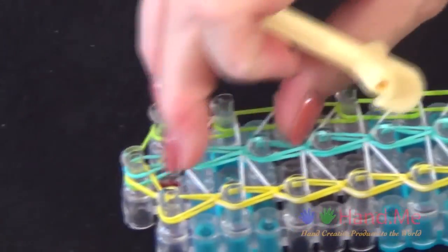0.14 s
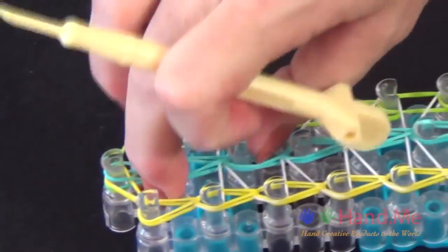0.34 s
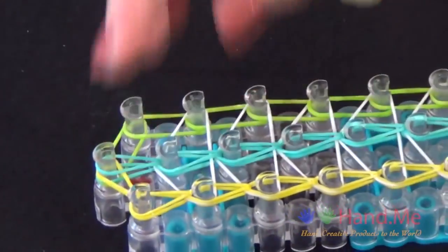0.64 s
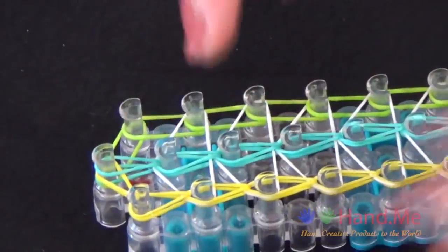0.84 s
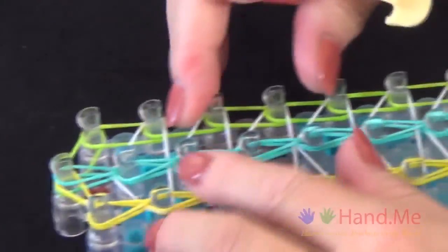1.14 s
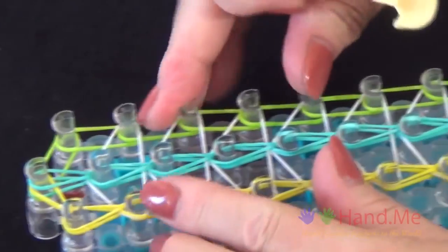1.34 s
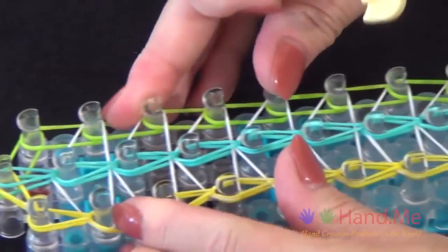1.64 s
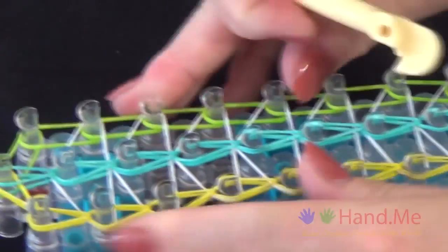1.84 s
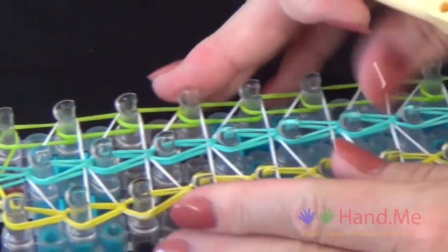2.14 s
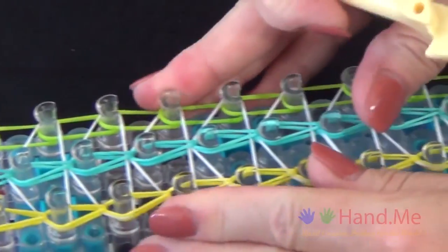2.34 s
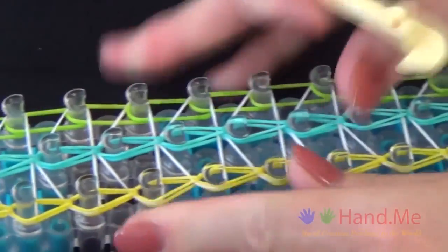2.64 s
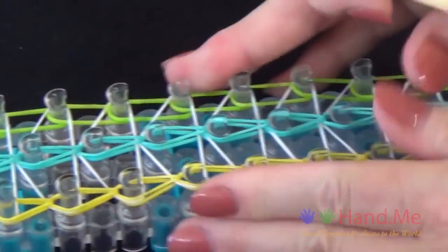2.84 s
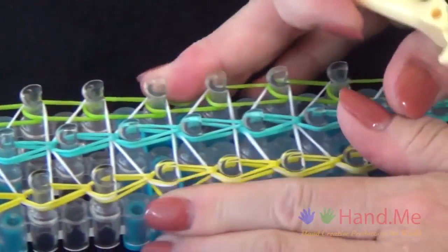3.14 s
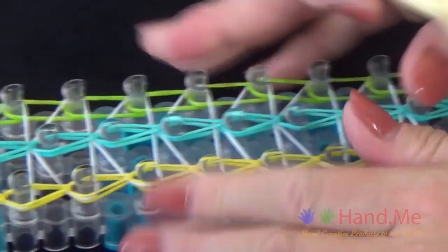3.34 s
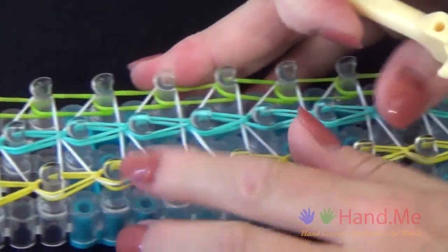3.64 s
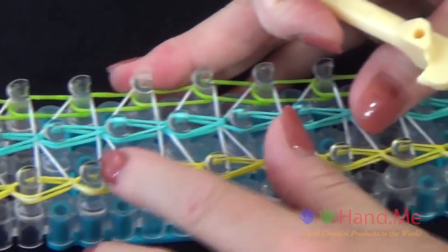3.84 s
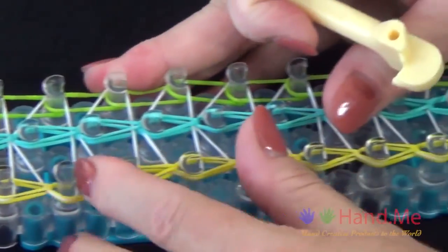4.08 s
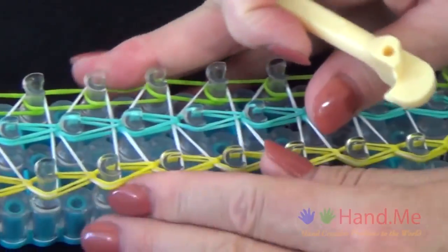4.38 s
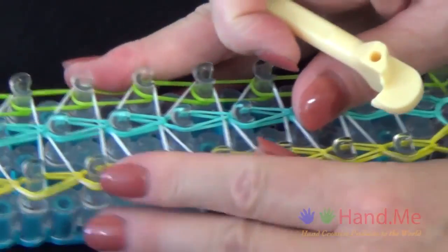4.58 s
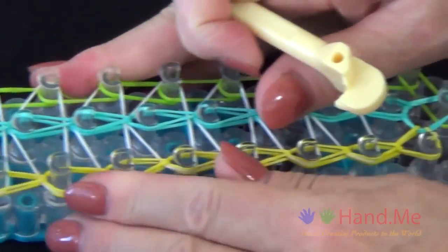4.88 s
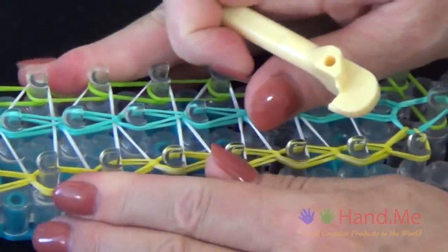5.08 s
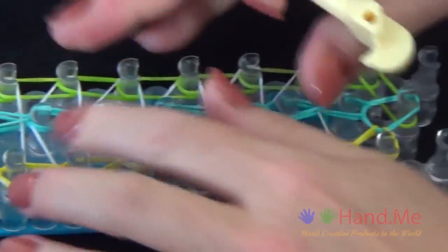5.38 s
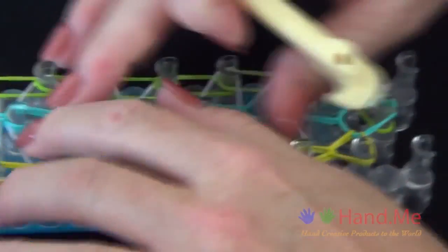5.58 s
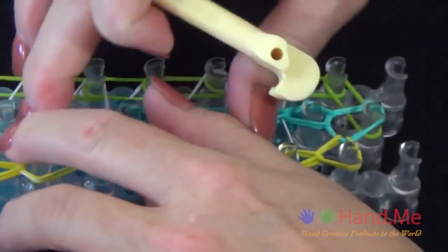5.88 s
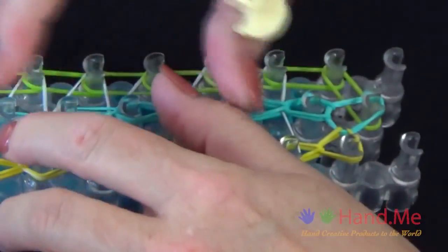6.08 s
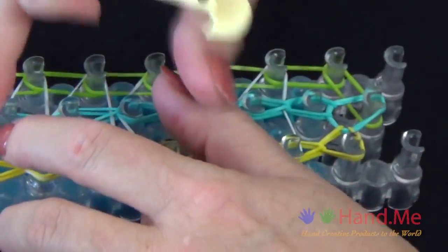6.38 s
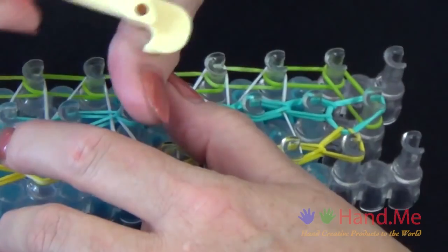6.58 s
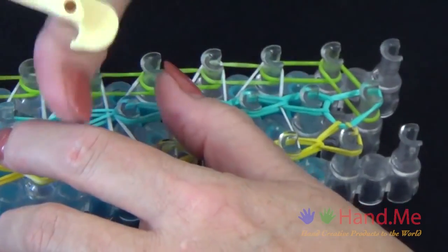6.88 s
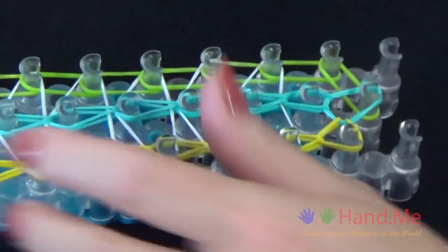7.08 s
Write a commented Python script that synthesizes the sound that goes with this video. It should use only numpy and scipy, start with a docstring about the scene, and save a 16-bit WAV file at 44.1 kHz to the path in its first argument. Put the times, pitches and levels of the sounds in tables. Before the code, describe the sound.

Fingertips press rubber bands down over plastic pegs with light irregular clicks, soft cloth rubs and low table bumps in a quiet room.

```python
"""A small quiet room: fingers with a plastic hook press rubber bands down the pegs of a plastic loom.
Nails and bands tick, slap and scrape as short forces that ring damped modes of the loom's parts;
knocks, pats and thuds ring the loom's rocking, the web of bands and the cloth-covered table in the same way.
Rubbing and creaking are random stick-slip jerks through such modes; cloth hiss is mostly coloured noise.
Low table rumble, a tremble below hearing through the microphone stand, room air and a hum lie beneath."""
import sys
import numpy as np
from scipy import signal
from scipy.fft import rfft, irfft, next_fast_len
from scipy.io import wavfile

SR = 44100
rng = np.random.default_rng(int(sys.argv[2]) if len(sys.argv) > 2 else 0)


def master_out(mix):
    """Clip the mix to full scale and print it as 16-bit PCM to the path in sys.argv[1]."""
    frames = np.transpose(np.atleast_2d(mix))
    ceiling = np.clip(frames, -1, 1)
    pcm = np.round(ceiling * 32767).astype(np.int16)
    wavfile.write(sys.argv[1], SR, pcm)


N = 318251
TIME = np.arange(N) / SR  # [s]

# modes of the loom's frame, base plate, pegs and peg rims:
# (frequency [Hz], bandwidth [Hz], relative level [dB])
FRAME = [(1034, 770, -1), (1206, 136, 10.5), (1554, 200, -1.5)]
PLATE = [(1965, 147, 4.5), (2090, 41, 7), (2116, 194, 8), (2610, 260, -3), (3200, 340, -2)]
PEG = [(3220, 120, -6), (4170, 200, -1), (4530, 99, -4), (4445, 430, 0), (5730, 460, 5), (5615, 330, 6),
       (5487, 600, 1), (7880, 420, -3), (8730, 610, -1), (9190, 520, -2.5)]
RIM = [(9170, 6600, -3.5), (11850, 660, -8.5), (12400, 790, -8), (13650, 1900, 1.5), (15100, 730, -2),
       (16060, 590, -16)]
# modes of the loom rocking on the cloth: (frequency [Hz], bandwidth [Hz], relative level [dB])
ROCKING = [(139.8, 23.3, 5), (202.6, 21.4, 0.5), (276.4, 13.3, -1), (330.6, 24.6, -6), (391.6, 57, -8.5),
           (555, 530, -33)]


def from_db(db):
    """Amplitude ratio of a level: 20 dB is a factor of ten."""
    return 10 ** (np.asarray(db) / 20)


def rms_one(x):
    """Normalise the mean power to 1."""
    return x / np.sqrt(np.mean(x ** 2) + 1e-30)


def add(out, s, sound):
    """Superpose a sound on out from time s."""
    i = max(round(s * SR), 0)
    out[i:i + len(sound)] += sound[:max(N - i, 0)]


def noise(spectrum):
    """Spectral shaping: white noise is filtered to a colour with steep ends, at rms 1."""
    hz, db = np.transpose(spectrum)
    size = next_fast_len(N)
    f = np.maximum(np.fft.rfftfreq(size, 1 / SR), 1)
    low_end = 1 + (hz[0] / f) ** 8
    high_end = 1 + (f / hz[-1] / 2) ** 8
    colour = from_db(np.interp(np.log(f), np.log(hz), db)) / np.sqrt(low_end * high_end)
    white = rng.standard_normal(size)
    return rms_one(irfft(rfft(white) * colour, size)[:N])


def drift(per_s):
    """Slow random fluctuation: Gaussian values, per_s of them a second, joined by straight lines."""
    values = rng.standard_normal(4000)
    return np.interp(TIME * per_s, np.arange(len(values)), values)


def resonate(force, modes, detune=0, uneven_db=0):
    """Modal superposition: parallel damped resonators, each randomly detuned and weighted."""
    out = 0
    for k, (hz, width, db) in enumerate(modes):
        shift, weight = rng.standard_normal(2)
        radius = np.exp(-np.pi * width / SR)  # a wider mode decays faster
        angle = 2 * np.pi * hz * (1 + detune * shift) / SR
        poles = [1, -2 * radius * np.cos(angle), radius * radius]
        ringing = signal.lfilter([1, 0, -1], poles, force + 1e-18)
        gain = (1 - radius * radius) / 2 * from_db(db + uneven_db * weight)
        out = out + (-1) ** k * gain * ringing  # neighbouring modes have opposite sign
    return out


def favour(modes, centre_hz, fall_db):
    """Position-dependent excitation: modes fall by fall_db an octave off centre_hz, up to one octave."""
    return [(hz, width, db - fall_db * min(abs(np.log2(hz / centre_hz)), 1)) for hz, width, db in modes]


def blow(modes, contact_s, scuff, span_s, detune, uneven_db):
    """Impact excitation: an impulse and a brief noisy scuff ring the modes; rms 1 over the first span_s."""
    t = np.arange(int(8 * span_s * SR)) / SR
    grip = t / contact_s * np.exp(-t / contact_s)  # swells and dies
    force = scuff * rng.standard_normal(len(t)) * grip / np.sqrt(np.sum(grip ** 2))
    force[int(contact_s * SR / 2)] += 1
    sound = resonate(force, modes, detune, uneven_db)
    edges_hz = [modes[0][0] / 2, min(modes[-1][0] * 1.5, SR * .45)]
    sound = signal.sosfilt(signal.butter(2, edges_hz, "band", fs=SR, output="sos"), sound)
    return sound / np.sqrt(np.mean(sound[:int(span_s * SR)] ** 2))


def slips(per_s, spread_db):
    """Stick-slip friction: jerks of uneven size and random sign at random moments."""
    sizes = from_db(spread_db * np.minimum(rng.exponential(1, N), 4))
    signs = rng.choice([-1, 1], N)
    return sizes * signs * (rng.random(N) < per_s / SR)


def moves(rows, rest_db):
    """Power addition: each move is a smooth arch of gain, added in power to a resting level."""
    start_db, stop_db = -11.5, -8  # fade half a length before and after the peak
    power = from_db(rest_db) ** 2
    for s, length, db in rows:
        away = (TIME - s) / (length / 2)
        fade_db = np.where(away < 0, start_db, stop_db) * away ** 2
        power = power + from_db(db + np.maximum(fade_db, -100)) ** 2
    return np.sqrt(power)


def peg_clicks():
    """Impact on coupled parts: each touch of nail, hook or band rings frame, plate, peg and rim."""
    # touches: (time [s], frame level [dB], base plate level [dB], peg level [dB], peg rim level [dB],
    # favoured plate frequency [Hz], favoured peg frequency [Hz]); levels of the main snap over 5 ms
    clicks = [(0.1077, -57.0, -64, -59, -66, 2300, 5070), (0.129, -64, -59, -54.5, -79.0, 2600, 5500),
              (0.1393, -50, -52.5, -44, -59, 2750, 4970), (0.1815, -82, -84, -65, -90.0, 2600, 4700),
              (0.1955, -57, -59, -64, -85, 2950, 4500), (0.3123, -65, -78, -72, -90.0, 2900, 4500),
              (0.344, -72, -76, -65, -83, 2900, 5100), (0.359, -70, -85, -62, -90.0, 2900, 4530),
              (0.3676, -84, -80.0, -73, -90.0, 2300, 4530), (0.397, -73, -73, -70, -90.0, 2100, 4500),
              (0.431, -55, -60, -56, -64, 2900, 6200), (0.486, -69, -70, -78, -90.0, 2600, 6000),
              (0.537, -64, -67, -75.0, -88.0, 2300, 6000), (0.675, -78, -79, -63, -90.0, 1900, 6800),
              (0.684, -49.5, -51.5, -52.5, -57, 2300, 5800), (0.6902, -51, -62, -61, -60, 2900, 5100),
              (0.7001, -53.5, -60, -54.5, -68, 2600, 5170), (0.7812, -65, -61, -59, -90.0, 1900, 5540),
              (0.8028, -65, -74.0, -57, -90.0, 1900, 5500), (0.8485, -73, -64, -54, -92, 2900, 5640),
              (0.8774, -84, -58.5, -57, -90.0, 2100, 5630), (1.3402, -56, -66, -48, -67, 1980, 6000),
              (1.352, -51, -56, -53.5, -68, 1900, 6100), (1.367, -61, -59, -52.5, -66, 1900, 5240),
              (1.3867, -65, -60, -55, -68, 2100, 5600), (1.4262, -71, -70, -66.5, -74, 2100, 5500),
              (1.56, -65, -59, -48.5, -52, 2100, 7400), (1.7099, -71, -63, -72.5, -92, 1900, 4450),
              (1.8492, -57.5, -57.5, -58, -90.0, 2600, 4900), (1.9079, -46, -47, -47.5, -52.5, 1900, 5930),
              (1.9179, -54.5, -57, -49.5, -65, 2600, 5200), (2.2061, -77, -76, -69.5, -81, 2900, 5100),
              (2.4995, -82, -71, -69, -90.0, 1900, 4400), (2.735, -69, -66, -78, -90, 2100, 4500),
              (2.752, -77, -64, -61, -90.0, 2300, 5500), (2.7766, -59, -66, -73, -81.0, 1900, 5500),
              (3.0918, -66, -52.5, -53.5, -63, 3200, 5800),
              (3.1654, -58.5, -55.5, -49.5, -56.5, 2300, 4900), (3.396, -86, -86, -63, -77, 1900, 6900),
              (3.4239, -57, -55, -46, -51.5, 1900, 5000), (3.6226, -66, -68.5, -69, -79, 1900, 4500),
              (3.749, -80, -84, -63, -88, 3200, 4470), (3.7963, -78, -66, -62, -90.0, 2300, 5130),
              (3.825, -70, -61, -58, -67, 1900, 4670), (3.899, -81, -66, -69, -82.0, 2300, 5100),
              (3.9513, -66, -80.0, -55.5, -70, 1900, 5060), (3.973, -63, -61, -68, -76, 3200, 8700),
              (4.3122, -49, -43.5, -32.5, -46.5, 1900, 5120), (4.334, -80.0, -61, -50, -82.0, 2100, 4530),
              (4.4456, -60.5, -58.0, -61.5, -63, 1900, 5130), (4.5362, -55, -73, -62.5, -71, 1900, 5330),
              (4.639, -67, -59, -63, -76, 1900, 4460), (4.649, -67, -58, -66, -82, 1900, 4500),
              (4.655, -65, -66, -61, -68, 2600, 5000), (4.699, -62, -52.5, -58.5, -66, 1900, 4540),
              (4.7988, -65.5, -68, -67, -90.0, 3200, 5100), (4.8848, -64.5, -63.5, -64, -90.0, 1900, 5600),
              (4.962, -81, -65, -71, -88, 2000, 4500), (4.9722, -72, -58.5, -81, -83, 2100, 4600),
              (5.271, -80.0, -56.5, -64, -71, 2100, 4500), (5.56, -64, -56, -60, -77, 1900, 5950),
              (5.63, -68, -59.5, -64, -84.0, 1900, 4760), (5.688, -58, -49, -49.5, -69, 2600, 5430),
              (5.7829, -82, -62, -65, -80, 1900, 5500), (5.82, -72, -61, -78.0, -90.0, 1900, 5500),
              (5.8612, -72, -65, -60, -90.0, 1900, 5030), (5.871, -70, -66, -82, -90.0, 2300, 8700),
              (5.907, -65.5, -67, -67.5, -90.0, 1900, 5070), (6.047, -66, -61.5, -62.5, -90.0, 2600, 4440),
              (6.137, -76, -64, -62.0, -88, 1900, 4800), (6.148, -65, -67, -69, -90.0, 1900, 4200),
              (6.1744, -64.5, -62.5, -59.5, -84.0, 1900, 4900),
              (6.3375, -76, -70, -63.0, -90.0, 1900, 5040), (6.547, -70, -68.5, -68, -78, 1900, 5640),
              (6.6764, -62.5, -66, -52, -89.0, 2300, 5730), (6.8661, -74.0, -81, -59.5, -83, 2900, 5860),
              (6.8787, -75, -71, -64, -85, 2900, 6000), (6.9751, -50, -51, -39, -52, 2330, 5500),
              (7.051, -80.0, -65, -62, -65, 2900, 5900), (7.055, -62, -54, -48.5, -59.5, 2300, 5600),
              (7.1511, -52.5, -43.5, -41, -55, 2300, 5940)]
    out = np.zeros(N)
    span_s, detune, uneven_db = .005, .006, 1.0
    for s, *levels, plate_hz, peg_hz in clicks:
        parts = FRAME, favour(PLATE, plate_hz, fall_db=38.5), favour(PEG, peg_hz, fall_db=10.5), RIM
        for modes, db in zip(parts, levels):
            snap = blow(modes, contact_s=.0005, scuff=0.83, span_s=span_s, detune=detune, uneven_db=uneven_db)
            # a softer, noisy scuff overlaps each snap, from 2.5 ms before it to shortly after
            soft = blow(modes, contact_s=0.0028, scuff=23.0, span_s=span_s, detune=detune, uneven_db=uneven_db)
            add(out, s, from_db(db) * snap)
            add(out, s - .0025, from_db(db - 15.5) * soft)
    return out


def band_snaps():
    """Sudden release: a stretched band slips off and slaps the frame with a crack, a ring and a thump."""
    # slaps: (time [s], crack level [dB], crack frequency [Hz], ring level [dB], ring frequency [Hz],
    # thump level [dB]); levels over the first 5 ms
    snaps = [(0.1956, -55, 1460, -52, 1367, -54), (0.595, -68, 1680, -71, 1370, -74),
             (2.776, -70, 1900, -63, 1166, -76), (4.5354, -52.5, 2020, -61.5, 1180, -49)]
    # modes of the slapped web of bands: (frequency [Hz], bandwidth [Hz], relative level [dB])
    thump = [(218, 100, 2), (443, 165, 6.5)]
    out = np.zeros(N)
    crack_width_hz, ring_width_hz = 520, 60
    for s, crack_db, crack_hz, ring_db, ring_hz, thump_db in snaps:
        crack = [(crack_hz, crack_width_hz, 0)]
        ring = [(ring_hz, ring_width_hz, 0)]
        for modes, db in ((crack, crack_db), (ring, ring_db), (thump, thump_db)):
            sound = blow(modes, contact_s=.0002, scuff=0.15, span_s=.005, detune=.003, uneven_db=0)
            add(out, s, from_db(db) * sound)
    return out


def scrapes():
    """Stick-slip excitation: a dragging nail's dense crackle rings the same four parts as a click."""
    # drags: (start [s], length [s], frame level [dB], base plate level [dB], peg level [dB],
    # peg rim level [dB]); levels in full contact
    drags = [(0.133, .025, -73, -79, -80, -84), (0.675, 0.028, -61, -78, -69, -82),
             (1.343, 0.045, -57.5, -73, -74, -85), (1.903, 0.044, -65, -75, -81, -78),
             (3.77, 0.035, -68, -75, -74, -82), (3.968, 0.02, -75, -63, -83, -85)]
    jerks = slips(per_s=1500, spread_db=4.5)
    parts = [rms_one(resonate(jerks, modes)) for modes in (FRAME, PLATE, PEG, RIM)]
    edge_s = 0.011  # ramp into and out of contact
    out = np.zeros(N)
    for s, length, *levels in drags:
        touching = np.clip(np.minimum(TIME - s, s + length - TIME) / edge_s, 0, 1)
        out += touching * sum(from_db(db) * part for db, part in zip(levels, parts))
    return out


def frame_knocks():
    """Rigid-body rocking: the loom bumps on the cloth and rings its rocking modes."""
    # bumps: (time [s], relative level [dB], favoured rocking frequency [Hz])
    knocks = [(0.106, -70, 153), (0.126, -62, 377), (0.146, -55.5, 243), (0.165, -60.5, 207),
              (0.197, -60.5, 172), (0.316, -60.5, 270), (0.334, -62, 292), (0.356, -63, 302),
              (0.403, -64, 200), (0.431, -53, 218), (0.447, -66, 202), (0.482, -69, 385), (0.501, -72, 203),
              (0.538, -67.5, 280), (0.558, -60, 171), (0.684, -64.5, 400.0), (1.34, -67, 148),
              (1.367, -67, 198), (1.385, -54.5, 206), (1.401, -56, 200), (1.528, -63, 152),
              (1.557, -58, 139), (1.612, -67.5, 270), (1.847, -71, 195), (1.905, -60.5, 191),
              (2.456, -63.5, 172), (4.314, -62, 207), (4.542, -51, 199), (4.974, -65.5, 145),
              (5.687, -66, 275), (5.824, -67, 270), (5.99, -64, 151), (6.006, -72, 280), (6.045, -61, 280),
              (6.971, -58.5, 152), (7.01, -72, 200), (7.052, -62.5, 266)]
    out = np.zeros(N)
    for s, db, hz in knocks:
        modes = favour(ROCKING, hz, fall_db=17.5)
        sound = blow(modes, contact_s=0.0028, scuff=0.51, span_s=.03, detune=0.0017, uneven_db=4.0)
        add(out, s, from_db(db + 5.0) * sound)
    return out


def band_pats():
    """Damped membrane-like modes: a fingertip pats the web of bands in a soft, long contact."""
    # pats: (time [s], level over the first 30 ms [dB])
    pats = [(1.152, -59.5), (2.5, -73), (5.99, -71), (6.044, -71)]
    # modes of the damped web of bands: (frequency [Hz], bandwidth [Hz], relative level [dB])
    web = [(487, 70, -15), (646, 58, 1.5), (1110, 210, -4)]
    out = np.zeros(N)
    for s, db in pats:
        sound = blow(web, contact_s=0.01273, scuff=0.95, span_s=.03, detune=0.0076, uneven_db=3.0)
        add(out, s, from_db(db) * sound)
    return out


def table_thuds():
    """Low-frequency plate modes: a hand leans on the table and its top answers."""
    # thuds: (time [s], relative level [dB])
    thuds = [(0.133, -45), (0.449, -42), (0.563, -40.5), (0.674, -65), (0.801, -54), (1.264, -36),
             (1.354, -50), (1.556, -42.5), (1.645, -51), (1.935, -36), (2.834, -45), (3.149, -44),
             (3.434, -53), (3.92, -39.5), (4.54, -40), (4.989, -40.5), (6.977, -41), (7.069, -41.5)]
    # modes of the table top: (frequency [Hz], bandwidth [Hz], relative level [dB])
    table = [(34, 24.7, -3.5), (58.6, 19.4, -1), (74, 22, -26.5)]
    out = np.zeros(N)
    for s, db in thuds:
        sound = blow(table, contact_s=0.0045, scuff=0.64, span_s=.03, detune=0.059, uneven_db=0.0)
        add(out, s, from_db(db - 2.5) * sound)
    return out


def cloth_slides():
    """Sliding friction: cloth hisses under the pushed loom and catching fibres ring the plastic."""
    # pushes: (time of full speed [s], length [s], hiss level [dB])
    slides = [(.17, 0.37, -74), (.41, 0.22, -83), (.70, 0.11, -67), (1.18, 0.12, -71), (1.37, 0.16, -69),
              (1.54, 0.14, -61), (1.90, 0.21, -60.5), (2.08, 0.18, -64), (2.6, 1, -74), (2.79, 0.16, -62),
              (2.95, 0.12, -64), (3.04, 0.11, -69.5), (3.15, 0.11, -61.5), (3.25, 0.089, -64),
              (3.36, 0.096, -63.5), (3.46, 0.17, -63.5), (3.66, 0.15, -66), (3.78, 0.32, -68),
              (3.92, 0.16, -61), (4.32, 0.15, -58), (4.42, 0.15, -63), (4.67, 0.17, -65),
              (4.96, 0.43, -71.5), (5.29, .13, -62), (5.57, .06, -70), (5.74, 0.17, -68),
              (6.02, 0.098, -74.5), (7.02, 0.1, -67.5), (7.19, 0.12, -58.5)]
    # hiss of the cloth: (frequency [Hz], relative spectrum level [dB])
    cloth = [(150, 11.5), (400, -2), (800, -1.5), (1250, 2.5), (1650, -3.5), (2100, -4.5), (2700, -7),
             (3200, -6.5), (3900, -13), (4700, -7), (6900, -16.5), (8500, -12.5), (10200, -20),
             (15500, -24.5)]
    weave = from_db(1.4 * drift(60))  # uneven cloth
    fibres = rms_one(resonate(slips(per_s=130, spread_db=4), FRAME + PLATE + PEG))
    return moves(slides, rest_db=-77) * (weave * noise(cloth) + from_db(-8) * fibres)


def finger_rubs():
    """Stick-slip friction: skin and rubber slip on the pegs and ring plate, pegs and rims."""
    # rubs: (time of full speed [s], length [s], relative level [dB])
    rubs = [(.16, 0.11, -86), (.33, 0.38, -79.5), (.8, 0.065, -77), (1.29, 0.17, -80.5), (1.54, 0.15, -69),
            (1.91, 0.2, -71), (2.07, 0.16, -71), (3.04, 0.045, -85), (3.23, .1, -85), (3.66, 0.079, -74.5),
            (3.78, 0.03, -66.5), (4.44, 0.089, -70), (4.65, 0.023, -68), (5.58, 0.15, -76.5),
            (5.85, 0.057, -75), (6.16, 1, -80), (6.69, 0.1, -74.5), (6.88, 0.019, -68), (7.03, 0.055, -88)]
    jerks = slips(per_s=700, spread_db=-0.5)
    parts = (PLATE, -2), (PEG, 0), (RIM, -14)  # with levels [dB]
    plastic = sum(from_db(db) * rms_one(resonate(jerks, modes)) for modes, db in parts)
    return moves(rubs, rest_db=-102) * plastic


def frame_creaks():
    """Stick-slip under load: slips ring the frame's bending, rasp frame and plate and shake the loom."""
    # creaks: (time of full pressure [s], length [s], relative level [dB])
    creaks = [(.15, 0.061, -68), (.365, 0.07, -59), (.44, 0.04, -59.5), (.52, 0.15, -71),
              (.692, 0.032, -59), (1.36, 0.049, -74), (6.005, 0.06, -70), (6.055, 0.03, -66)]
    # main bending mode of the frame: (frequency [Hz], bandwidth [Hz], relative level [dB])
    bending = [(1255, 165, 0)]
    strain = slips(per_s=290, spread_db=3.5)
    creaking = rms_one(resonate(resonate(strain, bending), bending))  # twice, for a narrower band
    rasping = from_db(-9) * rms_one(resonate(strain, FRAME + PLATE))
    shaking = from_db(1.5) * rms_one(resonate(strain, favour(ROCKING, 440, fall_db=12.0)))
    return moves(creaks, rest_db=-92.5) * (creaking + rasping + shaking)


def loom_stirs():
    """Random excitation of rocking: small slips shake the loom as it shifts under the hands."""
    # shifts: (time of full speed [s], length [s], level [dB])
    stirs = [(.17, 0.09, -61), (.41, 0.31, -54.5), (.72, 0.055, -60), (1.38, 0.1, -55.5),
             (1.63, 0.24, -62.5), (2.02, 0.1, -64), (2.47, 0.081, -78), (3.3, 1, -67), (3.96, 0.21, -64.5),
             (4.34, 0.038, -57.5), (4.57, 0.094, -70.5), (4.85, 0.09, -60), (5.02, 0.37, -67),
             (5.8, 0.71, -70), (6.07, 0.6, -64.5), (6.71, 0.32, -65.5), (7.08, 0.48, -57.5)]
    jerks = slips(per_s=900, spread_db=3.0)
    return moves(stirs, rest_db=-74.5) * rms_one(resonate(jerks, favour(ROCKING, 245, fall_db=9.5)))


def table_rumble():
    """Structure-borne low noise: moving arms rumble the table, and fingertip presses make its top give."""
    # arm movements: (time of full speed [s], length [s], level [dB])
    leans = [(.24, 0.23, -45), (.6, 0.42, -45), (1.37, 0.29, -48.5), (2.0, 0.24, -41), (3.3, 0.47, -45),
             (4.02, 0.14, -68), (4.57, 0.23, -48), (5.1, 1, -53), (5.9, 0.46, -49), (6.75, 0.13, -46),
             (7.1, 0.47, -35.5)]
    # fingertip presses: (time of full pressure [s], length [s], level [dB])
    presses = [(2.53, .09, -39), (2.62, 0.15, -31), (5.89, 0.15, -40), (6.08, 0.11, -36)]
    # spectra of the rumble and of the giving table top: (frequency [Hz], relative spectrum level [dB])
    rumble = [(18, -27), (33, 20), (44, 4), (57, 10), (75, -13.5), (100, -17), (160, -42)]
    give = [(22, 12), (33, -1.5), (45, -21.5), (60, -26.5), (85, -31), (130, -43)]
    return moves(leans, rest_db=-55) * noise(rumble) + moves(presses, rest_db=-np.inf) * noise(give)


def stand_sway():
    """Infrasonic vibration: the microphone stand trembles mostly below the range of hearing."""
    # (frequency [Hz], relative spectrum level [dB])
    spectrum = [(6, -3), (7, 8), (12, 8), (15, -15), (19, -28), (60, -83)]
    return from_db(-28.5) * noise(spectrum)


def room(x, t60, wet_db, wall_hz):
    """Diffuse reverberation: an exponentially decaying noise tail, 5 ms late and dulled by the walls."""
    t = np.arange(SR // 2) / SR
    tail = rng.standard_normal(len(t)) * np.exp(-np.log(1000) * t / t60) * (t > .005)
    tail = tail / np.sqrt(np.sum(tail ** 2))
    tail = signal.sosfilt(signal.butter(1, min(wall_hz, SR * .45), fs=SR, output="sos"), tail)
    return x + from_db(wet_db) * signal.fftconvolve(x, tail)[:N]


def background():
    """Stationary noise and tones: coloured room air and faint hum tones of slowly wandering phase."""
    # room air: (frequency [Hz], relative spectrum level [dB])
    air = [(47, -26), (80, 0), (96, -11.5), (133, -12.5), (232, -23), (271, -19), (378, -26), (461, -27.5),
           (575, -28), (1000, -35), (1090, -32), (2720, -46), (3030, -45), (12500, -49.5), (16000, -60)]
    # hum tones: (frequency [Hz], rms level [dB])
    hum_tones = [(90.5, -72.5), (129.5, -74.5), (1061, -85)]
    hum = 0
    for hz, db in hum_tones:
        phase = 2 * np.pi * hz * TIME + 0.71 * drift(6.1)
        hum = hum + from_db(db) * np.sqrt(2) * np.sin(phase)
    return from_db(-62) * noise(air) + hum


def scene():
    """Superposition: short contacts sound with the room's tail, other sources directly; one channel."""
    contacts = peg_clicks() + band_snaps() + scrapes() + frame_knocks() + band_pats() + table_thuds()
    loom = room(contacts, t60=0.19, wet_db=-17, wall_hz=8260)
    friction = cloth_slides() + finger_rubs() + frame_creaks()
    handling = loom_stirs() + table_rumble() + stand_sway()
    return (loom + friction + handling + background())[None]


def record(dry):
    """Band limiting: a steep elliptic low-pass cuts the top above 16 kHz."""
    return signal.sosfilt(signal.ellip(10, .2, 70, 16000, fs=SR, output="sos"), dry)


dry = scene()
out = record(dry)
master_out(out)
```